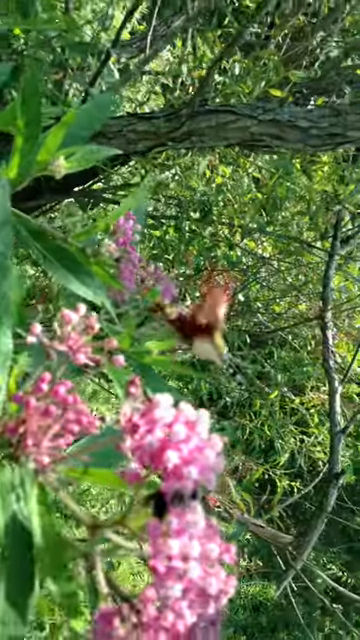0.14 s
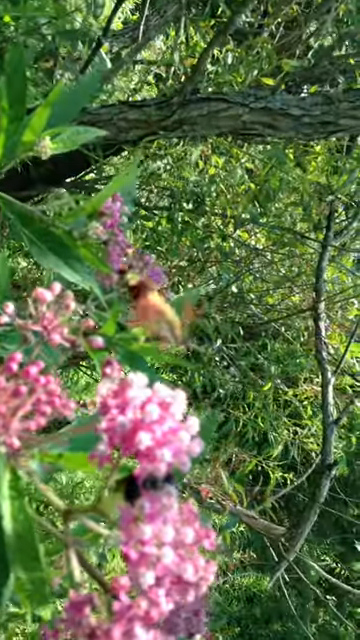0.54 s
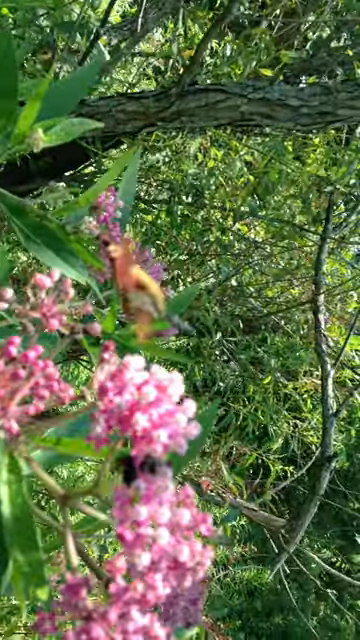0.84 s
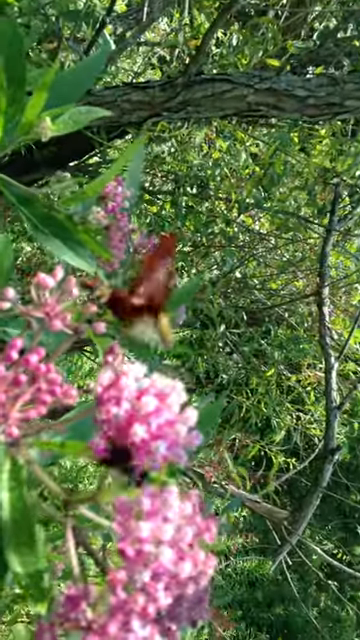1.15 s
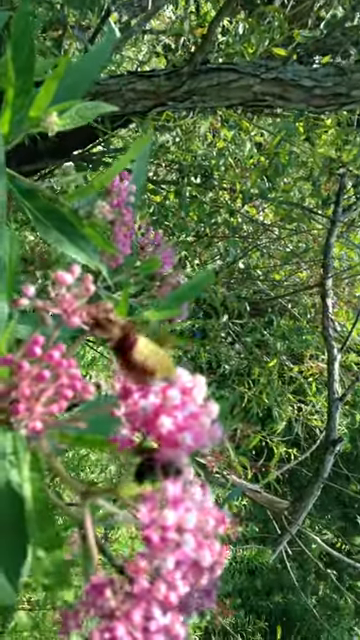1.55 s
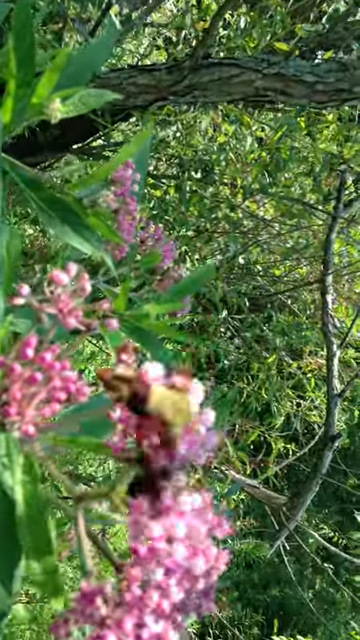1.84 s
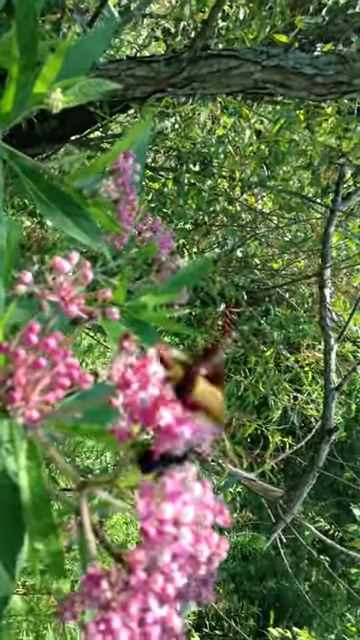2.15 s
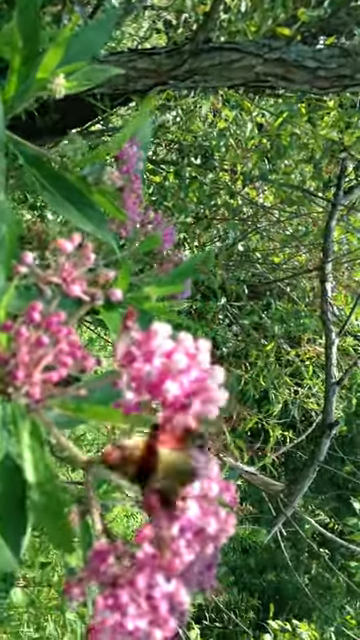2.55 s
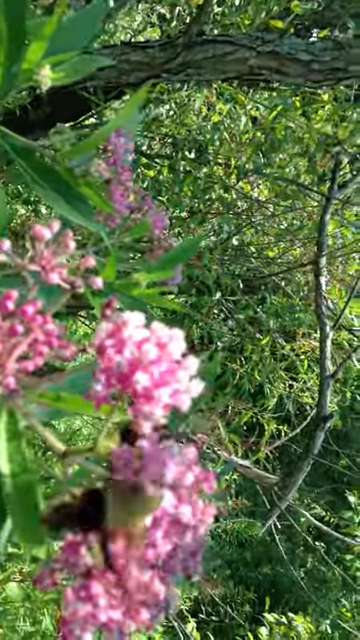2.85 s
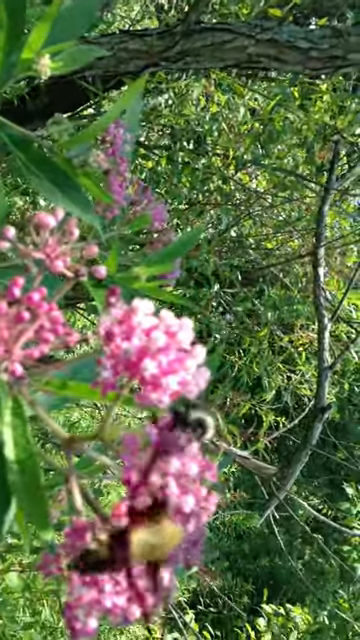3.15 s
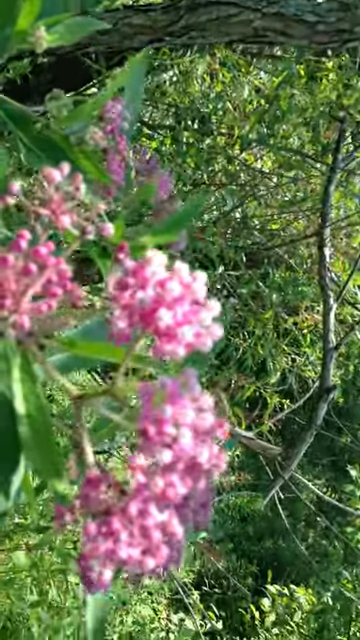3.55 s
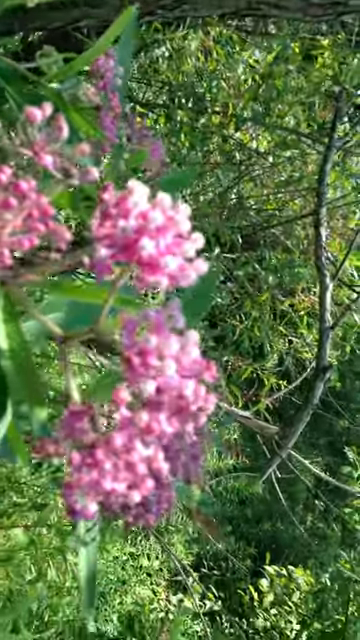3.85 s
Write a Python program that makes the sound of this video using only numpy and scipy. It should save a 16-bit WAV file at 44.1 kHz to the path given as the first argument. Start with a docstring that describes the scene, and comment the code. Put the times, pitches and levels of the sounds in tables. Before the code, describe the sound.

A bumblebee's buzz is the main sound, rising from about 3.7 seconds and bursting loud, low and rough at 3.9, its pitch wavering and sagging as it passes with airy wing swishes. Before it, quiet steady outdoor hiss, a faint distant motor throb strongest in the first second, and a hovering moth's soft, low hum swelling intermittently. Tiny petal flicks, stem ticks and faint rustling come from 2.6 seconds.

```python
"""Hovering moth and passing bumblebee

A clearwing moth hums faintly at flower heads: unsteady wingbeat harmonics in pulsing, filtered noise.
Quiet outdoor air is steady coloured noise; a far motor throbs as short low rings blurred by echoes.
Wings flick the petals in tiny noise bursts, stems tick and the flower head rustles.
Then a bumblebee takes off and drones right past the microphone: summed wingbeat harmonics whose pitch
sags as it goes by, with a swish of air on every stroke."""
import sys
import numpy as np
from scipy import signal
from scipy.fft import rfft, irfft
from scipy.io import wavfile
from scipy.ndimage import uniform_filter1d

SR = 44100
rng = np.random.default_rng(int(sys.argv[2]) if len(sys.argv) > 2 else 0)


def store_wav(level_fs):
    """Save 16-bit WAV to argv[1]."""
    pcm = np.round(np.clip(np.atleast_2d(level_fs), -1, 1) * 32767)
    wavfile.write(sys.argv[1], SR, pcm.T.astype(np.int16))


N = 176400
SECONDS = np.arange(N) / SR

# colour of outdoor air and hiss: frequency_hz, relative_level_db
AIR_COLOUR = [(25, -28), (50, -6), (90, 7), (130, 11.5), (200, 15), (330, 13), (500, 8), (750, 4),
              (1100, -0.5), (2000, -2), (4500, -0.5), (7000, -3), (10000, -4), (15000, -5)]
AIR_DB = -64.5

# level of the far motor's throb: time_s, level_db
MOTOR_LEVEL = [(0, -67), (.4, -65), (.75, -73), (.97, -65.5), (1.5, -75), (4, -74.5)]
# colour of the motor's echoes: frequency_hz, relative_level_db
MOTOR_ECHO_COLOUR = [(150, -18), (260, -5.5), (340, 3), (430, -1), (560, -18), (1000, -52)]
THROB_HZ, THROB_FIRST_S = 20.14, 0.009
THROB_RING_HZ, THROB_RISE_S, THROB_DECAY_S = 335, 0.0016, 0.0054
THROB_OFFBEAT = 0.34  # gain against the main beat
MOTOR_ECHO_DB = -5.5  # against the throb

# level of the hovering moth's hum: time_s, level_db
MOTH_LEVEL_CURVE = [(0, -77), (.42, -72.5), (.59, -61), (.68, -83), (1.05, -76.5), (1.25, -66.5),
                    (1.42, -76.5), (1.77, -60.5), (1.9, -65.5), (1.945, -57.5), (2.04, -58.5),
                    (2.07, -63.5), (2.14, -59.5), (2.22, -79), (2.87, -70), (2.98, -61), (3.02, -69),
                    (3.07, -60.5), (3.18, -73.5), (3.33, -60), (3.42, -66), (3.455, -56.5), (3.515, -51.5),
                    (3.54, -58.5), (3.6, -75), (3.65, -62)]
# colour of the moth's harmonics and stirred air: frequency_hz, relative_level_db
MOTH_COLOUR = [(25, -50), (60, -24), (95, -16), (120, -3.5), (168, 1), (240, -1.5), (330, -10.5),
               (480, -21), (800, -26), (2000, -61)]
MOTH_HZ, MOTH_WANDER = 57.2, 0.02005  # mean wingbeat; its rms drift as a share
MOTH_TONE_DB, MOTH_PULSING = 2, 0.36  # tone against stirred air; depth of the air's pulsing
MOTH_SLIP = 0.87  # rms drift between harmonics (radians)

# level of the flower head's rustle: time_s, level_db
RUSTLE_LEVEL_CURVE = [(0, -97), (2.4, -72.5), (2.9, -65.5), (3.03, -68.5), (3.22, -64), (3.3, -59.5),
                      (3.335, -57), (3.37, -67.5), (3.56, -72.5)]
# colour of the rustle: frequency_hz, relative_level_db
RUSTLE_COLOUR = [(100, -10.5), (350, 8.5), (750, 2.5), (1300, -3), (3000, -6), (15000, -12)]
RUSTLE_GRAIN_DB = 5  # limit of the grainy swing either way
# wing tips flicking petals and leaves: start_s, level_db, decay_s
PETAL_FLICKS = [(2.6458, -48, 0.0014), (2.6557, -49, 0.00056), (2.911, -46, 0.00073),
                (3.1284, -50.5, .0015), (3.1945, -50.5, 0.0013), (3.2222, -51, 0.0011),
                (3.3183, -51, .0006), (3.3255, -45.5, 0.001), (3.332, -45.5, 0.00094), (3.87, -45, 0.00054),
                (3.892, -45, .0003), (3.916, -48, 0.00028)]
# colour of the flicks: frequency_hz, relative_level_db
FLICK_COLOUR = [(200, 0), (800, 4), (2000, 2), (5000, 5), (10000, 6.5), (15000, -2)]
# soft ticks of stems: start_s, level_db
STEM_TICK_TIMES = [(3.006, -59.5), (3.405, -57.5)]
# colour of the stem ticks: frequency_hz, relative_level_db
STEM_COLOUR = [(400, -29), (1200, 1), (1900, 9), (2800, -25), (8000, -21)]
STEM_DECAY_S = 0.0019

# bee's wingbeat before jitter: time_s, pitch_hz
BEE_PITCH_CURVE = [(3.55, 107.9), (3.598, 115.8), (3.634, 117.4), (3.706, 139.4), (3.74, 141.5),
                   (3.786, 141.1), (3.818, 129.4), (3.842, 116.1), (3.878, 116.2), (3.902, 125.3),
                   (3.922, 130.5), (3.968, 113.4), (4.0, 108)]
# bee's drone as it turns past: time_s, fundamental_db, octave_db, third_harmonic_db, upper_harmonics_db
BEE_LEVEL_CURVES = [(3.6, -74, -81, -76, -76), (3.70, -68, -59.5, -77, -70.5), (3.745, -53, -56, -67, -69),
                    (3.785, -43, -65, -60, -64.5), (3.82, -42.5, -40, -47.5, -55.5),
                    (3.845, -45.5, -40, -44.5, -46), (3.88, -50, -39.5, -49, -57),
                    (3.9, -35.5, -27, -41.5, -46), (3.927, -35.5, -41, -33, -43.5),
                    (3.945, -49, -30.5, -44, -52), (3.97, -67, -44, -52, -62.5), (4.0, -66, -59, -66, -74)]
# colour of the upper harmonics close by: frequency_hz, relative_level_db
BEE_NEAR_COLOUR = [(470, 1.5), (600, -4), (720, -17), (1000, -23.5), (1500, -35.5), (3000, -40)]
# colour of the upper harmonics at a distance: frequency_hz, relative_level_db
BEE_FAR_COLOUR = [(420, -19), (570, 2.5), (690, 2), (850, -8), (980, -13), (1260, -7.5), (2000, -17.5),
                  (3000, -16)]
# level of the swish of the bee's strokes: time_s, level_db
SWISH_LEVEL_CURVE = [(3.55, -72), (3.7, -66.5), (3.8, -61), (3.855, -61), (3.88, -56), (3.912, -53),
                     (3.935, -60.5), (4.0, -68)]
# colour of the swish: frequency_hz, relative_level_db
SWISH_COLOUR = [(40, -12), (200, -14), (700, 11), (1500, 2.5), (3000, 3), (6000, 3.5), (10000, 0),
                (15000, -1.5)]
# colour of the downwash puffs: frequency_hz, relative_level_db
WASH_COLOUR = [(40, -42), (100, -5), (165, 21), (300, -4), (550, 4), (850, -15), (1500, -31)]
WASH_DB = -3.5  # against the upper-harmonics level curve
BEE_START_S, BEE_RISE_S = 3.52, 0.092  # take-off and its fade-in
BEE_CLOSE_S, BEE_CLOSING_S = 3.78, 0.052  # start and length of the change from distant to close colour
BEE_JITTER = 0.0059  # rms pitch jitter as a share
BEE_FADE_DB = 3  # rms slow fading of single upper harmonics
BEE_ROUGH_DB, BEE_SMEAR = 2.5, 0.56  # close-by level and phase (radians) wobble, times log of harmonic
BEE_SCATTER = 0.46  # fixed phase spread per harmonic step (radians)
STROKE_WIDTH, BACKSTROKE, STROKE_STEADY = 0.073, 0.27, 0.47  # cycles; gain; constant part of the gate

TOP_HZ = 15350


def undb(db):
    """Decibels to gain."""
    return 10 ** (np.asarray(db) / 20)


def curve(table, axis=1):
    """A table's column joined by straight lines in time."""
    rows = np.array(table)
    return np.interp(SECONDS, rows[:, 0], rows[:, axis])


def colour(points, hz):
    """A spectrum's dB at the given frequencies, joined along log frequency."""
    rows = np.array(points)
    return np.interp(np.log(np.maximum(hz, 1)), np.log(rows[:, 0]), rows[:, 1])


def unit(x):
    """Scale to rms 1."""
    return x / np.sqrt(np.mean(x ** 2))


def noise(points):
    """White noise shaped to a given colour, rms 1."""
    hz = np.arange(N // 2 + 1) * SR / N
    spectrum = rfft(rng.standard_normal(N)) * undb(colour(points, hz))
    return unit(irfft(spectrum, N))


def walk(rate):
    """Smooth random motion, rms 1, that changes about rate times a second."""
    hold = max(int(SR / rate), 1)
    steps = np.repeat(rng.standard_normal(N // hold + 1), hold)
    smooth = uniform_filter1d(uniform_filter1d(steps, hold), hold)
    return unit(smooth[:N])


def burst(start, decay):
    """An envelope that jumps up and dies away exponentially."""
    age = SECONDS - start
    return (age >= 0) * np.exp(-np.clip(age / decay, 0, 50))


def outdoor_air():
    """Even air and hiss as steady coloured noise."""
    return noise(AIR_COLOUR) * undb(AIR_DB)


def throb_ring(age):
    """One beat of the motor: a low sine that swells quickly and dies away."""
    envelope = (1 - np.exp(-age / THROB_RISE_S)) * np.exp(-age / THROB_DECAY_S)
    return envelope * np.sin(2 * np.pi * THROB_RING_HZ * age)


def far_motor():
    """Regular rings with weaker offbeats, blurred by echoes that stand as coloured noise."""
    beats = (SECONDS - THROB_FIRST_S) * THROB_HZ
    onbeat = throb_ring(beats % 1 / THROB_HZ)
    offbeat = throb_ring((beats + 0.5) % 1 / THROB_HZ)
    throb = (onbeat + THROB_OFFBEAT * offbeat) * undb(3.7 * walk(30))
    blurred = unit(throb) + undb(MOTOR_ECHO_DB) * noise(MOTOR_ECHO_COLOUR)
    return unit(blurred) * undb(curve(MOTOR_LEVEL))


def moth(count=10):
    """Soft, unsteady wingbeat harmonics in the pulsing air that the wings stir."""
    phase = 2 * np.pi * np.cumsum(MOTH_HZ * (1 + MOTH_WANDER * walk(18))) / SR
    tone = 0
    for k in range(1, count + 1):
        level = undb(colour(MOTH_COLOUR, k * MOTH_HZ) + 3.6 * walk(25.11))
        tone = tone + level * np.cos(k * phase + MOTH_SLIP * walk(10))
    stirred = unit(noise(MOTH_COLOUR) * (1 + MOTH_PULSING * np.cos(phase)))
    hum = unit(stirred + undb(MOTH_TONE_DB) * unit(tone))
    return hum * undb(curve(MOTH_LEVEL_CURVE))


def flowers():
    """Wings flick petals and leaves; stems tick and the flower head rustles, all in coloured noise."""
    grain = undb(RUSTLE_GRAIN_DB * np.tanh(walk(250)))
    rustle = unit(noise(RUSTLE_COLOUR) * grain) * undb(curve(RUSTLE_LEVEL_CURVE))
    flicks = sum(undb(db) * burst(start, decay) for start, db, decay in PETAL_FLICKS)
    ticks = sum(undb(db) * burst(start, STEM_DECAY_S) for start, db in STEM_TICK_TIMES)
    return rustle + flicks * noise(FLICK_COLOUR) + ticks * noise(STEM_COLOUR)


def bee_drone(hz, turns, lowest, upper, count=20):
    """Wingbeat harmonics that change colour and grow rougher close by."""
    near = np.clip((SECONDS - BEE_CLOSE_S) / BEE_CLOSING_S, 0, 1)
    drone = 0
    for k in range(1, count + 1):
        if k <= len(lowest):
            db = lowest[k - 1]
        else:
            close = near * colour(BEE_NEAR_COLOUR, k * hz)
            distant = (1 - near) * colour(BEE_FAR_COLOUR, k * hz)
            db = upper + close + distant + BEE_FADE_DB * walk(24.935)
        # higher harmonics are rougher and slip more, so each stroke has its own shape
        rough = np.log(k) * near * BEE_ROUGH_DB * walk(110)
        scatter = BEE_SCATTER * (k - 1) * rng.standard_normal()
        slip = scatter + BEE_SMEAR * near * np.log(k) * walk(70)
        drone = drone + np.sqrt(2) * undb(db + rough) * np.cos(2 * np.pi * k * turns + slip)
    return drone


def wing_stroke(turns, at):
    """A bell-shaped puff at one point of every wing cycle."""
    offset = (turns - at + 0.5) % 1 - 0.5
    return np.exp(-(offset / STROKE_WIDTH) ** 2)


def bee():
    """From take-off: the drone, with a swish and a puff of downwash on each stroke."""
    hz = curve(BEE_PITCH_CURVE) * (1 + BEE_JITTER * walk(60))
    turns = np.cumsum(hz) / SR
    *lowest, upper = (curve(BEE_LEVEL_CURVES, axis=k) for k in range(1, len(BEE_LEVEL_CURVES[0])))
    drone = bee_drone(hz, turns, lowest, upper)
    strokes = wing_stroke(turns, 0) + BACKSTROKE * wing_stroke(turns, 0.555)
    gate = STROKE_STEADY + strokes * undb(3 * walk(1500))
    swish = unit(gate * noise(SWISH_COLOUR)) * undb(curve(SWISH_LEVEL_CURVE))
    downwash = unit(gate * noise(WASH_COLOUR)) * undb(upper + WASH_DB)
    flying = np.clip((SECONDS - BEE_START_S) / BEE_RISE_S, 0, 1)
    return flying * (drone + swish + downwash)


def scene():
    """Both insects and the flowers in the open air, with the motor far off, in mono."""
    return (outdoor_air() + far_motor() + moth() + flowers() + bee())[None]


def record(dry):
    """The recorder cuts the top with a steep low-pass."""
    lowpass = signal.ellip(12, 0.1, 70, TOP_HZ, fs=SR, output="sos")
    return signal.sosfilt(lowpass, dry)


dry = scene()
out = record(dry)
store_wav(out)
```